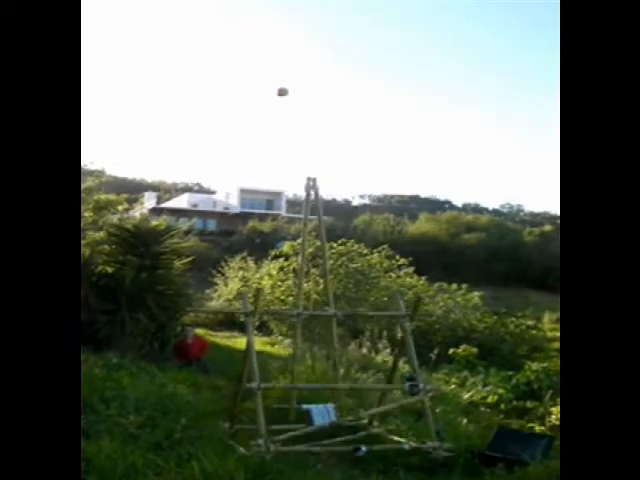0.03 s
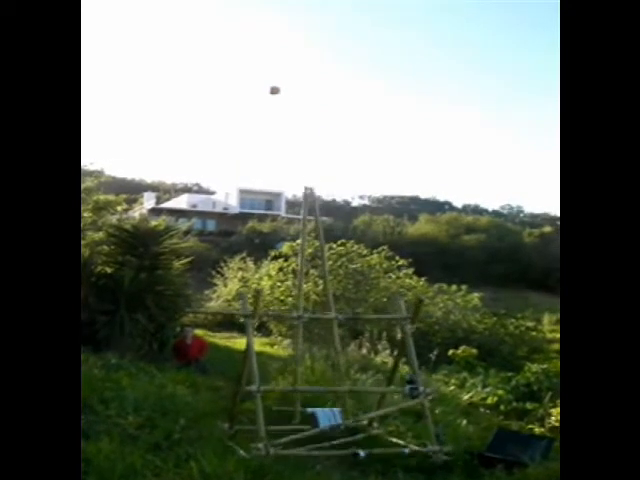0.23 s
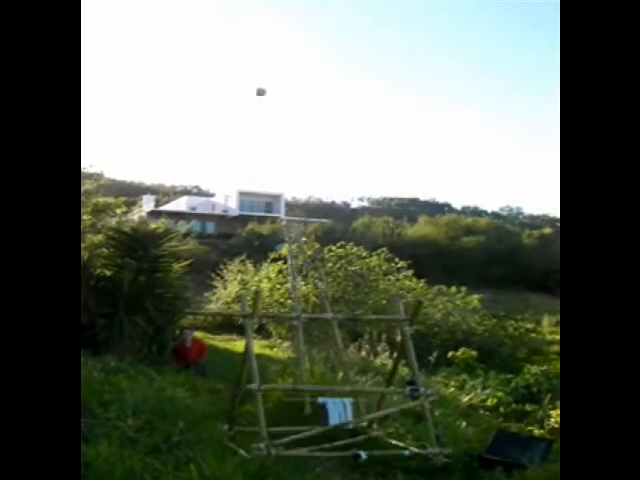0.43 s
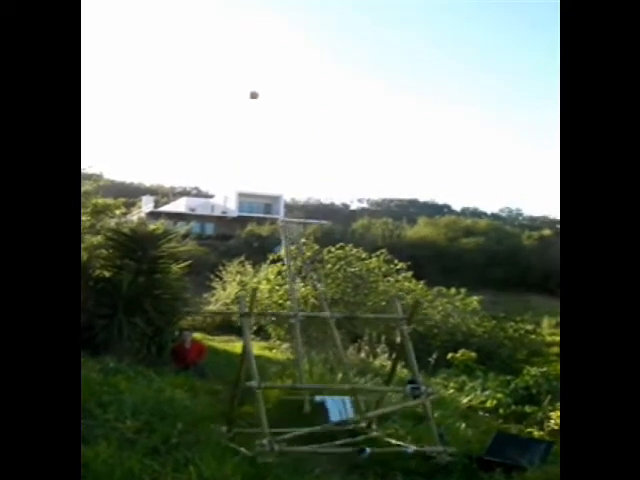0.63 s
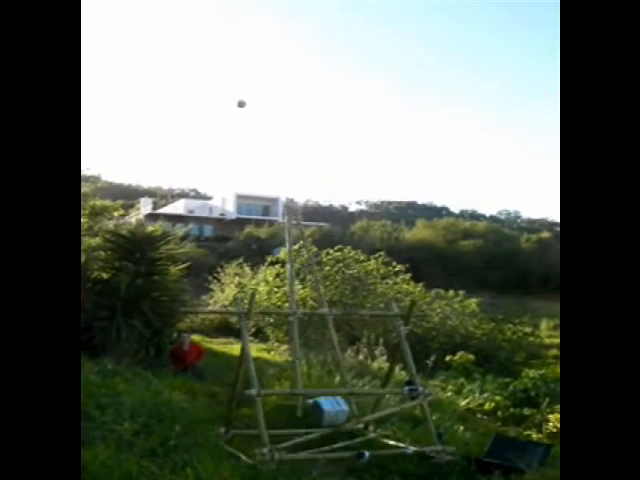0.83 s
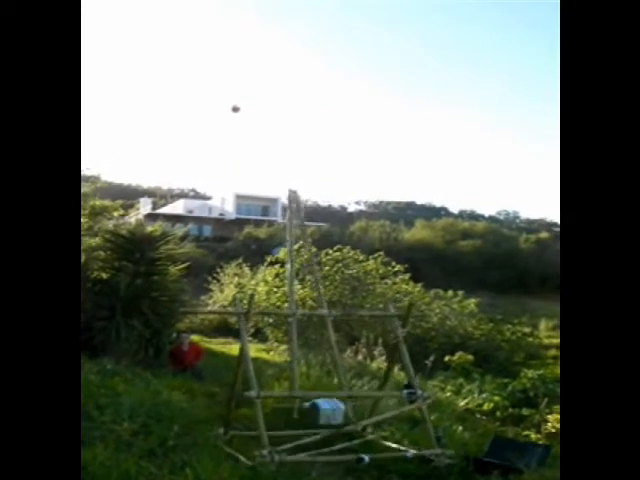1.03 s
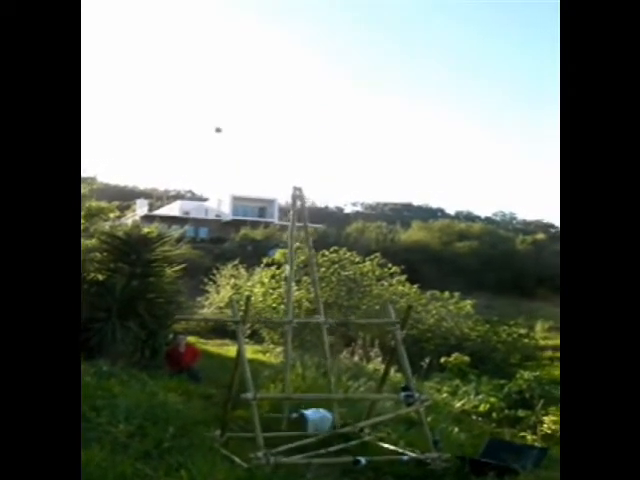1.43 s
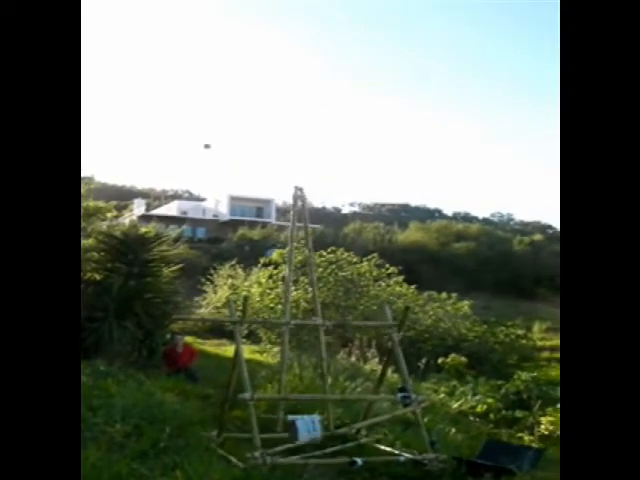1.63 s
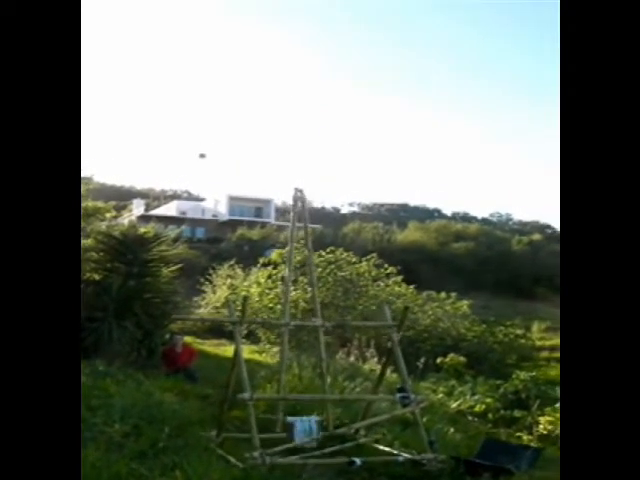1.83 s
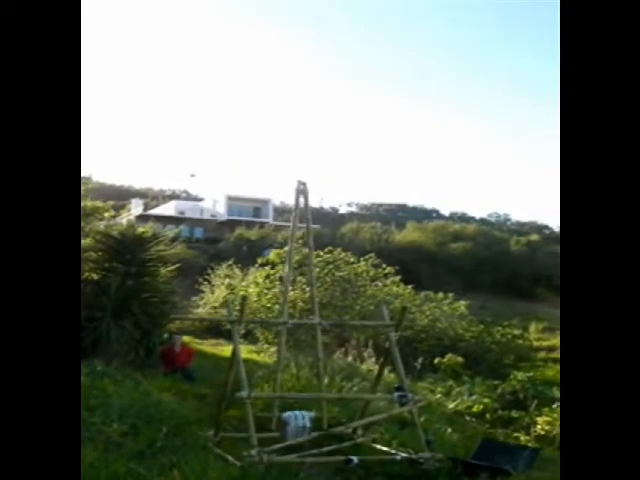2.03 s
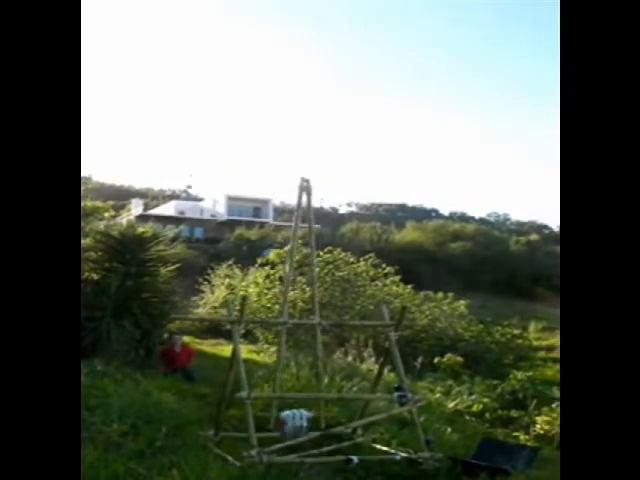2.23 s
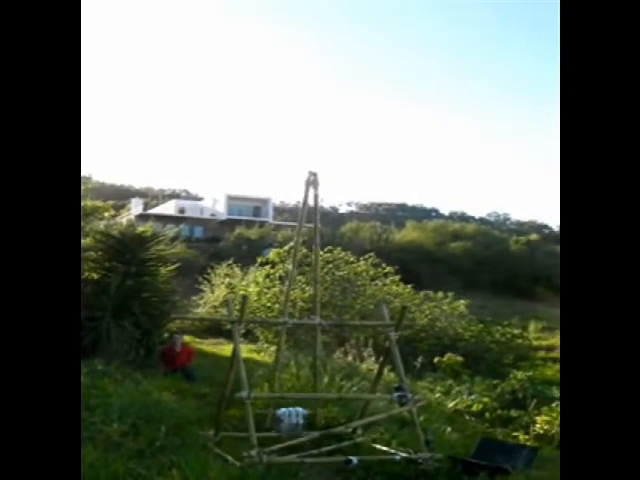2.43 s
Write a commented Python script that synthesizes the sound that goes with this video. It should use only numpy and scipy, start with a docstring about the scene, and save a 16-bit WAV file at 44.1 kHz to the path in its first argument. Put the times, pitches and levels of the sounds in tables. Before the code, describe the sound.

A wooden trebuchet knocks and clatters in uneven clusters as it swings in a garden, its ropes rubbing. The knocks thin to light ticks as it settles. Faint wind hisses and rumbles on a gritty-sounding small microphone.

```python
"""A wooden trebuchet settling after its throw

A trebuchet of lashed poles swings to and fro in a garden. After a faint click, arm, weight and frame
knock together in uneven clusters, the ropes rub, and loose parts tick as it settles. Faint wind hisses
and rumbles. A small camera clips the hardest blows and adds a gritty sheen by sampling coarsely."""
import sys
import numpy as np
from scipy import signal
from scipy.fft import rfft, irfft, next_fast_len
from scipy.io import wavfile

SR = 44100
rng = np.random.default_rng(int(sys.argv[2]) if len(sys.argv) > 2 else 0)


def transcribe(signal):
    """Save signal, clipped to [-1, 1], as a 16-bit WAV file at the path in sys.argv[1]."""
    frames = np.atleast_2d(signal).T
    limited = np.clip(frames, -1, 1)
    pcm = np.round(limited * 32767).astype(np.int16)
    wavfile.write(sys.argv[1], SR, pcm)


N = 114660


def knocks():
    """A faint, short click comes first; then poles knock, with a note, a clatter, an echo and a thud."""
    # Each row: start in seconds, seconds to fade by 60 dB, the note in Hz, its level in dB,
    # then the clatter's level in dB in the bass, low middle, middle and treble.
    # The first row is the click; in the others, the note is that of the struck pole.
    events = [(.041, .06, 473, -21, -25, -22.5, -21.5, -21.5),
              (.241, 0.08, 982, -10.5, -34.5, -20, -22, -19.5),
              (0.328, 0.054, 541, -13, -19, -12.5, -22, -20),
              (.342, .1, 733, -21, -17.5, -17.5, -21.5, -22), (.377, .06, 1506, -13, -32.5, -21, -14, -13),
              (0.405, 0.058, 1820, -14, -37, -25, -23, -18),
              (0.462, .08, 649, -16.5, -29.5, -28, -20.5, -24), (.611, 0.048, 771, 1.5, -14, -6.5, -2, -9),
              (.618, 0.061, 1094, -5, -8.5, -5, -11, -10.5), (.637, 0.093, 763, -17, -10.5, -6.5, -7, -15),
              (0.653, 0.15, 423, -10.5, -21, -9.5, -12.5, -16.5),
              (.671, 0.088, 570, -10.5, -33, -11.5, -8.5, -18),
              (.689, 0.067, 1126, -7.5, -16.5, -23, -18, -17),
              (0.71, 0.077, 1598, -9, -38.5, -23, -16, -20),
              (.809, .055, 1275, -11, -21.5, -28, -12.5, -16.5),
              (.905, 0.017, 1255, -9.5, -26.5, -19, -12, -38),
              (.992, 0.049, 508, -10, -19.5, -5, -21.5, -10.5),
              (1.002, 0.058, 1055, -10, -19.5, -19, -8, -12),
              (1.014, 0.037, 580, -1.5, -20.5, -11.5, -6.5, -8),
              (1.061, 0.025, 2470, -17, -16.5, -11, -23, -10.5),
              (1.07, 0.1, 531, -11.5, -22, -19.5, -18.5, -33),
              (1.138, 0.063, 560, -6.5, -17, -14, -12, -18),
              (1.149, 0.13, 919, -10, -22, -15.5, -12.5, -17),
              (1.191, 0.021, 1107, 1.5, -39, -5.5, -8.5, -4),
              (1.24, 0.033, 1167, -13.5, -37, -33, -26, -25), (1.254, .07, 703, -9, -13.5, -8.5, -8.5, -10),
              (1.27, .09, 704, -20, -19, -10, -11, -19.5), (1.287, .07, 562, -25, -20.5, -16, -25, -30.5),
              (1.365, 0.072, 397, -22.5, -18.5, -19.5, -18, -15),
              (1.541, 0.077, 294, -16, -22, -15.5, -15, -22),
              (1.577, 0.069, 992, -13.5, -23.5, -22.5, -30, -23.5),
              (1.649, 0.068, 640, -4, -17, -13.5, -14, -15), (1.654, 0.092, 284, -8.5, -17, -9, -10, -13.5),
              (1.676, 0.1, 745, -17.5, -24, -30, -17, -17.5),
              (1.71, 0.046, 1600, -32, -25.5, -27, -13.5, -14.5),
              (1.938, 0.024, 2860, -23, -37, -33, -24.5, -23),
              (1.992, 0.024, 2870, -15, -37, -30, -19, -10.5),
              (2.002, 0.045, 1770, -24, -36, -28.5, -38, -26),
              (2.032, 0.018, 2740, -14.5, -48, -31, -30, -27),
              (2.046, 0.022, 2760, -23, -46, -46.5, -43, -21),
              (2.181, 0.04, 2285, -26, -45, -39, -27.5, -29),
              (2.283, 0.021, 1570, -17.5, -40, -27.5, -33, -21.5),
              (2.314, 0.038, 604, -9.5, -36, -13.5, -22.5, -28.5),
              (2.322, 0.17, 805, -21.5, -31, -27.5, -31, -26),
              (2.372, 0.056, 353, -22.5, -31, -22, -28, -29.5),
              (2.52, .06, 1060, -22.5, -37, -28, -22, -52), (2.538, 0.063, 426, -20, -31, -22.5, -32, -29)]
    # Each row: lower and upper edge in Hz of one of those four bands.
    bands = [(190, 450), (450, 900), (900, 1800), (1800, 3400)]
    # The garden's echo against the chatter, in dB for each band.
    garden_db = [0.5, -3, -1, -7]
    touches_per_s, touch_size, attack_s = 420, 0.82, 0.00054
    track, t = np.zeros(N), np.arange(SR // 4) / SR
    filters = [signal.butter(3, band, 'band', fs=SR, output='sos') for band in bands]
    for start, t60, note_hz, note_db, *band_db in events:
        decay = fade(t, t60)
        touching = rng.random(len(t)) < touches_per_s / SR
        touches = touch_size * touching * rng.uniform(-0.98, 1, len(t)) * decay
        touches[0] = 1  # a sharp start
        chatter = signal.fftconvolve(touches, wood_contact(t))[:len(t)]
        chatter = unit(chatter * fade(t, 4 * t60))
        echo = unit(rng.standard_normal(len(t)) * fade(t, t60=0.23))
        clatter = sum(amp(db) * unit(signal.sosfilt(sos, chatter + amp(echo_db) * echo))
                      for sos, db, echo_db in zip(filters, band_db, garden_db))
        clatter *= np.sqrt(np.mean(decay ** 2))  # shorter sounds carry less energy
        note = amp(note_db) * np.sin(2 * np.pi * note_hz * t) * decay * (1 - np.exp(-t / attack_s))
        thud_hz = 105 * np.exp(rng.normal(0, 0.16))
        thud = amp(band_db[0] - 5.5) * np.sin(2 * np.pi * thud_hz * t) * fade(t, t60=.07)
        add(track, start, amp(0.5) * clatter + amp(-0.5) * note + thud)
    return track


def wood_contact(t):
    """One touch of wood on wood makes a dry crack and sets the frame ringing."""
    # Each row: a ringing pitch of the frame in Hz, relative level in dB, seconds to fade by 60 dB.
    frame_tones = [(230, -3, .12), (290, -5, .09), (379, -1, .11), (537, 0, .11), (721, -2, .09),
                   (960, -6, .05), (1135, -1, .07), (1239, -2, .08), (1424, -2, .08), (1535, -2, .09),
                   (1632, -3, .08), (2073, -5, .07), (2277, -4, .08), (2636, -3, .08)]
    ring = sum(amp(db + rng.normal(0, 1.46)) * fade(t, t60) * np.sin(2 * np.pi * (hz * t + rng.random()))
               for hz, db, t60 in frame_tones)
    crack = rng.standard_normal(len(t)) * fade(t, t60=0.016)
    return crack + amp(-20) * ring


def lashings():
    """Rope and poles rub in a dense stream of tiny slips."""
    # Each row: time in seconds, then the levels in dB of the rub's low body and its bright edge.
    rub_levels = [(0, -28, -38), (.18, -35.5, -39), (.25, -23.5, -28), (.31, -28.5, -33),
                  (.43, -25.5, -23.5), (.51, -28, -34.5), (.6, -22, -25.5), (.78, -23.5, -30.5),
                  (.84, -23, -30.5), (.875, -14.5, -20), (.9, -22, -33.5), (.95, -18.5, -25),
                  (1.1, -24, -30), (1.21, -19, -23.5), (1.33, -26, -36), (1.5, -30.5, -48),
                  (1.62, -23, -28.5), (1.75, -28.5, -36.5), (1.87, -38.5, -39), (1.96, -32, -27.5),
                  (2.1, -46.5, -42.5), (2.28, -38, -37), (2.43, -35, -51), (2.54, -27.5, -40),
                  (2.6, -28, -40)]
    # The tone of the body and of the edge. Each row: frequency in Hz, level in dB.
    body_tone = [(100, -13.5), (220, -3), (400, -2.5), (600, 0.5), (1000, 0.5), (1600, -3.5), (1900, -8.5),
                 (2400, -14)]
    edge_tone = [(1000, -32), (1600, -17), (2100, -4.5), (2600, 6.5), (3200, -5)]
    slips_per_s = 4500
    body_db, edge_db = curves(rub_levels)
    slipping = rng.random(N) < slips_per_s / SR
    slips = slipping * rng.standard_normal(N) * amp(1.7 * rng.standard_normal(N))
    body = amp(body_db + 1) * unit(coloured(slips, body_tone))
    edge = amp(edge_db + 2) * unit(coloured(slips, edge_tone))
    return body + edge


def wind():
    """Gusts rumble on the microphone, and the bushes hiss steadily."""
    # Each row: time in seconds, level of the rumble in dB.
    gusts = [(0.0, -31), (0.14, -24), (0.3, -31.5), (0.35, -23), (0.51, -30), (0.64, -14), (0.66, -26),
             (1.26, -27.5), (1.39, -21.5), (1.44, -29.5), (1.72, -21.5), (1.76, -29.5), (2.25, -32.5),
             (2.27, -34), (2.56, -23.5), (2.6, -37)]
    # The tone of the rumble and of the hiss. Each row: frequency in Hz, level in dB.
    rumble_tone = [(10, -24), (22, -9), (31, 3.5), (42, -5), (56, -11), (88, -9), (130, -17.5), (220, -27),
                   (500, -29)]
    hiss_tone = [(100, 12.5), (300, 1.5), (900, 4), (2000, 1), (3200, -9.5)]
    rumble_db, = curves(gusts)
    return noise(rumble_tone, rumble_db) + noise(hiss_tone, db=-37.5)


def garden_scatter(x):
    """The garden throws back a blurred copy of the sound, with its phases shuffled."""
    # Each row: frequency in Hz, gain of the copy in dB.
    scatter_tone = [(30, -12), (120, -16.5), (400, -12.5), (700, -8), (1000, -8), (1150, -49), (1700, -22),
                    (3000, -26)]
    spectra = signal.stft(x, nperseg=512)[2]
    shuffled = spectra * np.exp(2j * np.pi * rng.random(spectra.shape))
    return coloured(signal.istft(shuffled, nperseg=512)[1][:N], scatter_tone)


def far_wind():
    """Distant wind blows softly from all around."""
    # Each row: frequency in Hz, relative level in dB.
    far_tone = [(30, 8), (120, -1.5), (400, -7), (750, 0.5), (1020, -4), (1200, -33.5), (3000, -28.5)]
    return noise(far_tone, db=-46)


def amp(db):
    """Turn decibels into a gain."""
    return 10 ** (np.asarray(db) / 20)


def unit(x):
    """Scale x to an average (rms) level of 1."""
    return x / np.sqrt(np.mean(x ** 2) + 1e-20)


def curves(rows):
    """Draw a line through each column after the time, one value per sample."""
    times, *columns = np.transpose(rows)
    return [np.interp(np.arange(N) / SR, times, column) for column in columns]


def filtered(x, response):
    """Scale each frequency in x by response(hz)."""
    size = next_fast_len(N + 8192)
    return irfft(rfft(x, size) * response(np.fft.rfftfreq(size, 1 / SR)), size)[..., :N]


def coloured(x, tone):
    """Shape the tone of x with rows of frequency in Hz and gain in dB."""
    points_hz, db = np.transpose(tone)
    return filtered(x, lambda hz: amp(np.interp(np.log(hz + 1), np.log(points_hz + 1), db)))


def noise(tone, db):
    """Make noise with this tone and level."""
    return amp(db) * unit(coloured(rng.standard_normal(N), tone))


def low_pass(x, cut_hz):
    """Cut away everything above cut_hz, very steeply."""
    return filtered(x, lambda hz: 1 / np.sqrt(1 + (hz / cut_hz) ** 140))


def fade(t, t60):
    """Die away by 60 dB every t60 seconds."""
    return np.exp(-np.log(1000) * t / t60)


def add(track, start, sound):
    """Mix a sound in at start seconds."""
    part = track[max(0, round(start * SR)):][:len(sound)]
    part += sound[:len(part)]


def scene():
    """The machine stands straight ahead; garden scatter and distant wind give a little width."""
    mid = knocks() + lashings() + wind()
    side = garden_scatter(mid) + far_wind()
    return np.array([mid + side, mid - side])


def record(dry):
    """The camera clips, keeps a narrow band and holds samples, which mirrors the band into the treble."""
    band_hz, hold_samples, top_hz = 3075, 4, 14400
    clipped = np.clip(low_pass(dry, band_hz), -1, 1)
    narrow = low_pass(clipped, band_hz)
    held = np.repeat(narrow[:, ::hold_samples], hold_samples, axis=1)[:, :N]
    return low_pass(np.clip(held, -.97, .97), top_hz)


dry = scene()
out = record(dry)
transcribe(out)
```